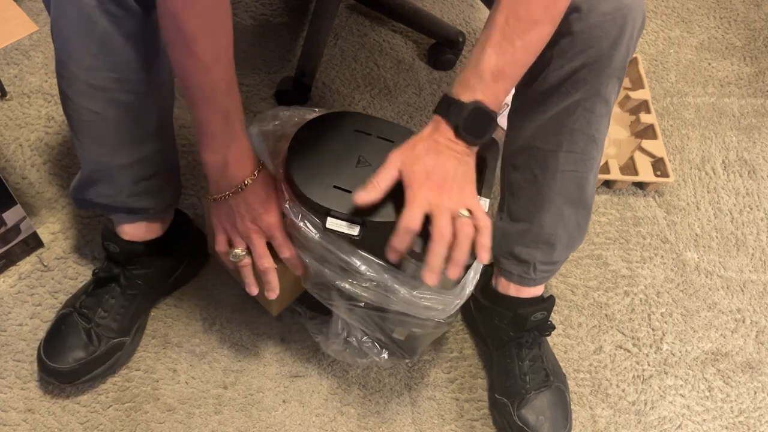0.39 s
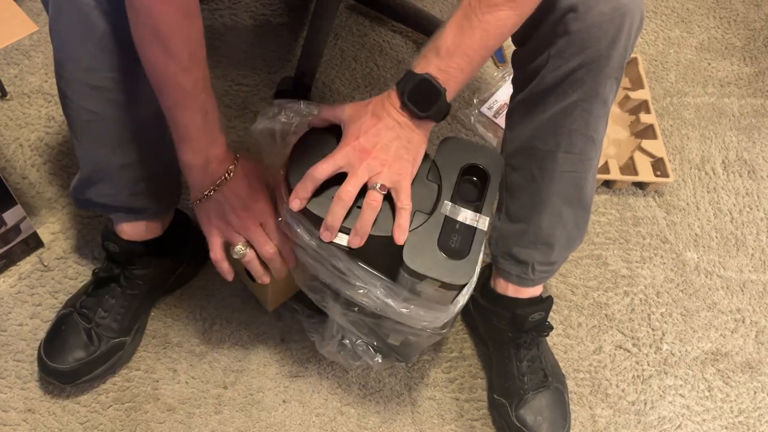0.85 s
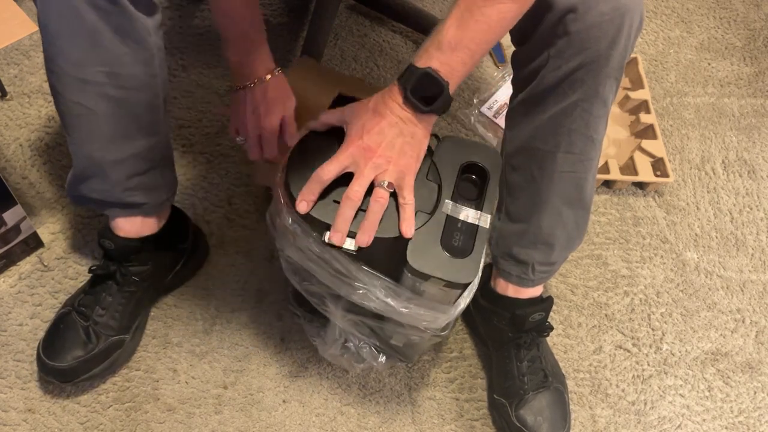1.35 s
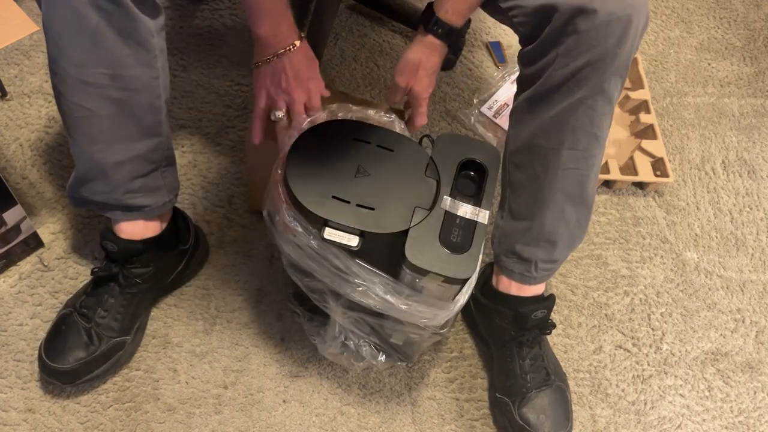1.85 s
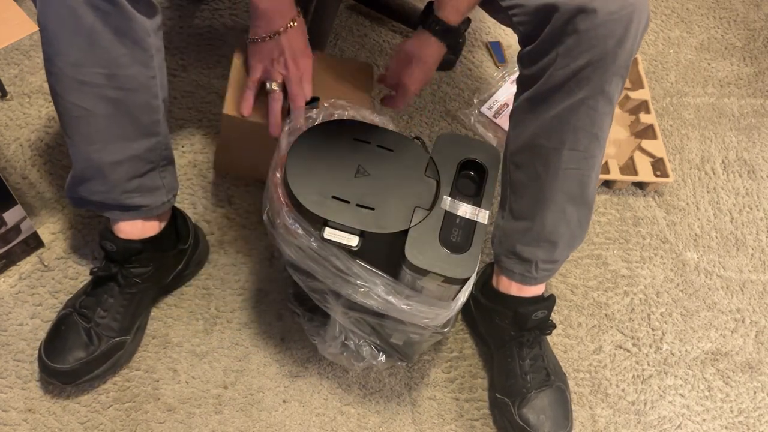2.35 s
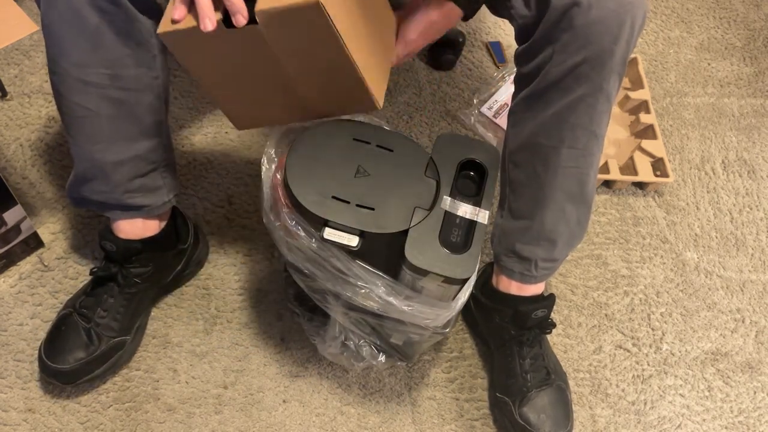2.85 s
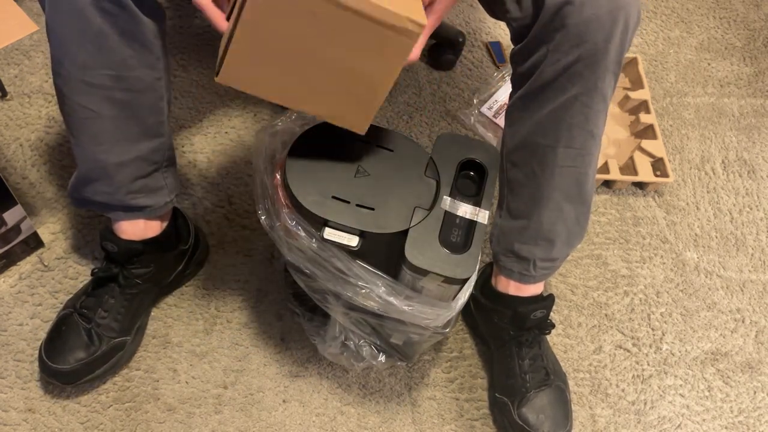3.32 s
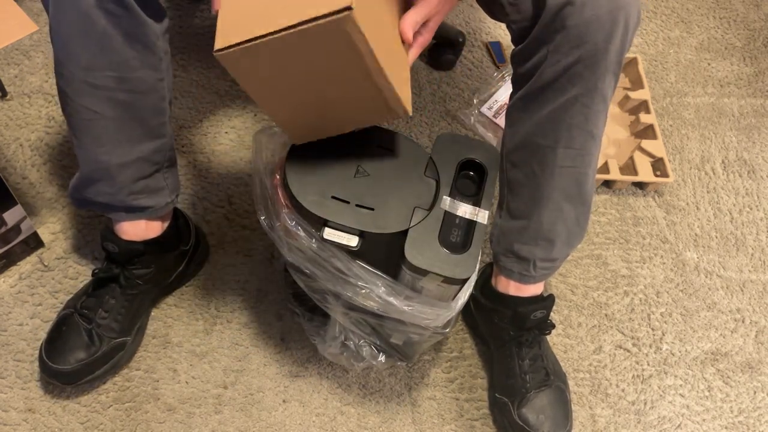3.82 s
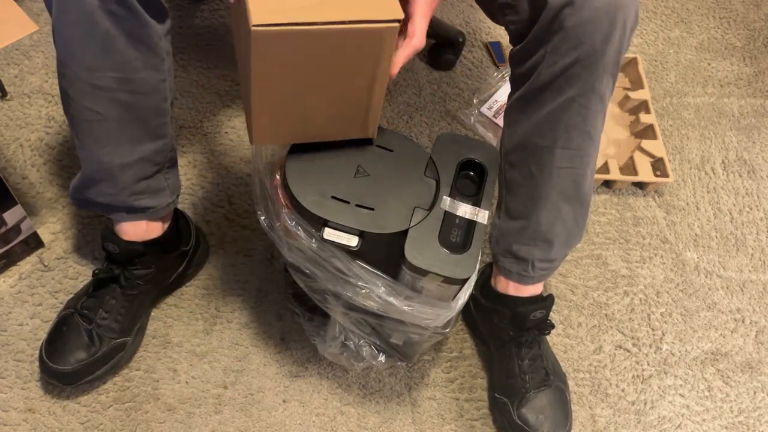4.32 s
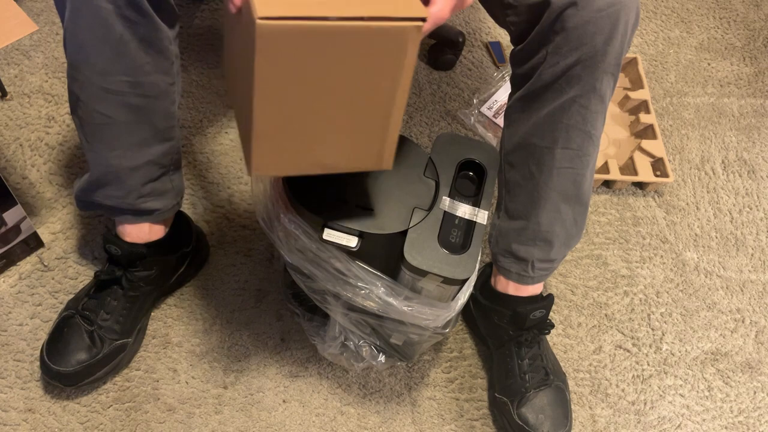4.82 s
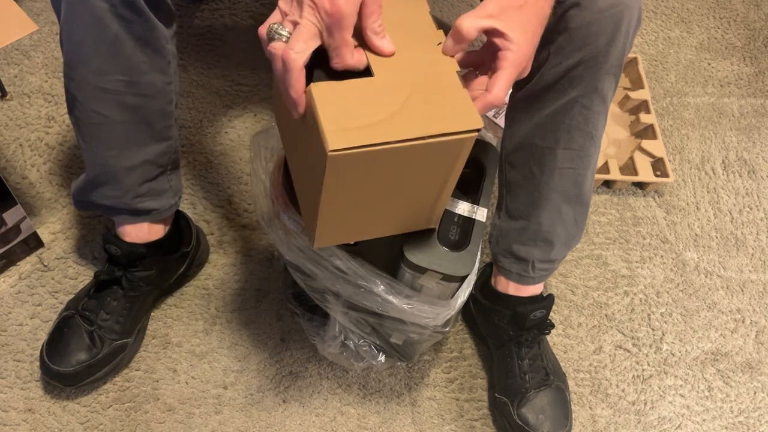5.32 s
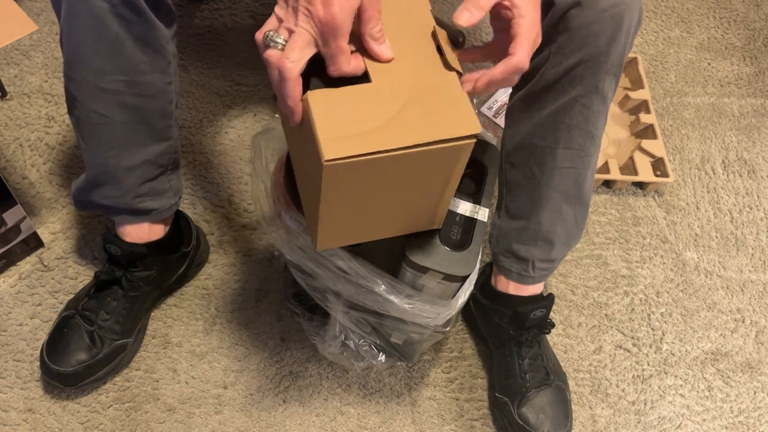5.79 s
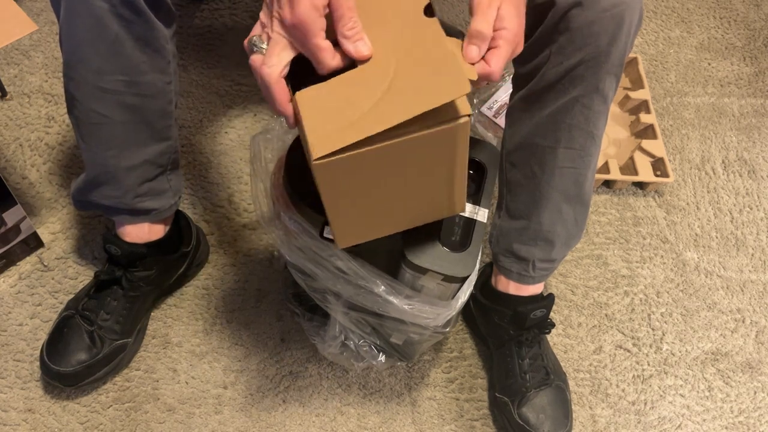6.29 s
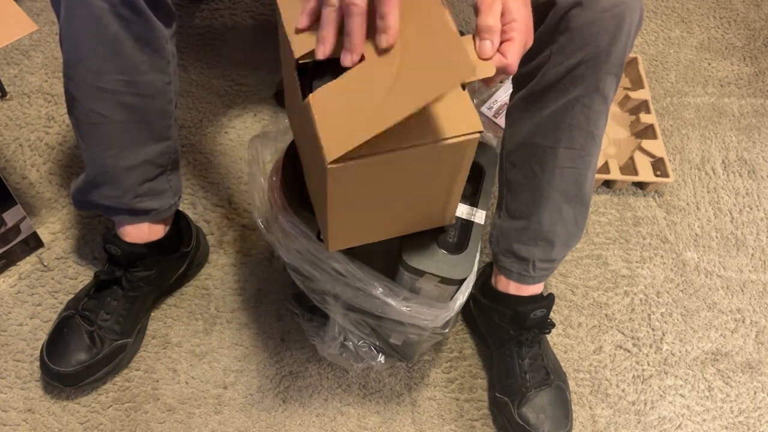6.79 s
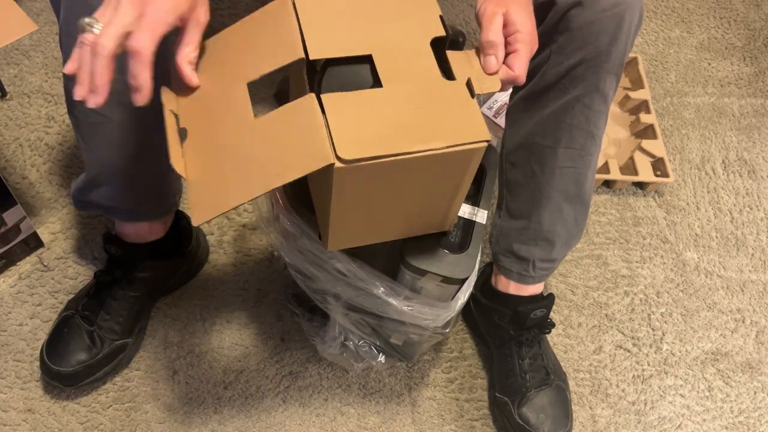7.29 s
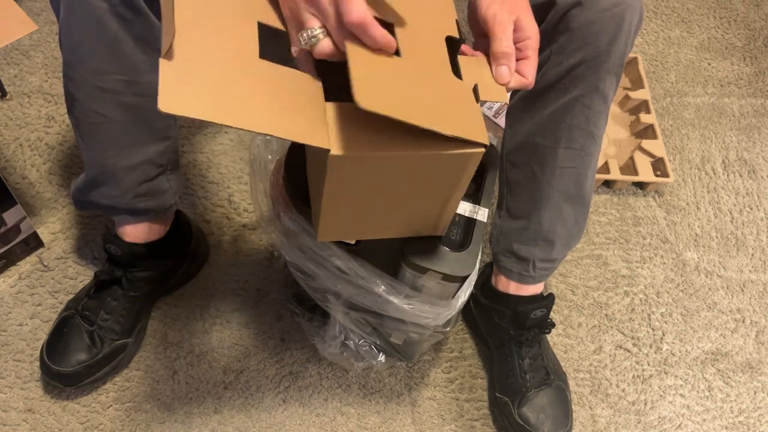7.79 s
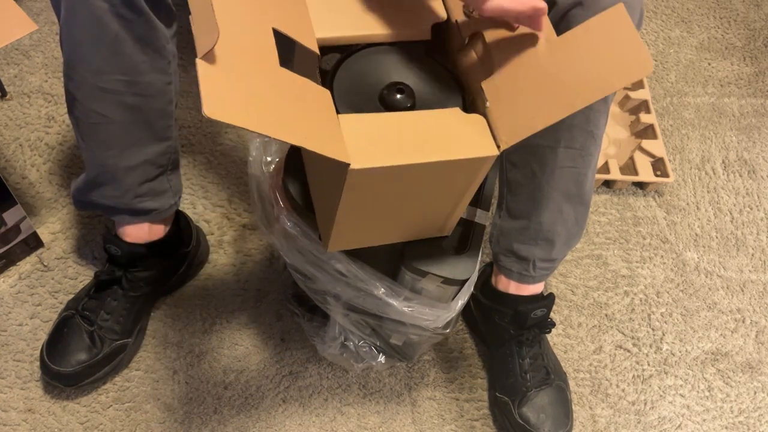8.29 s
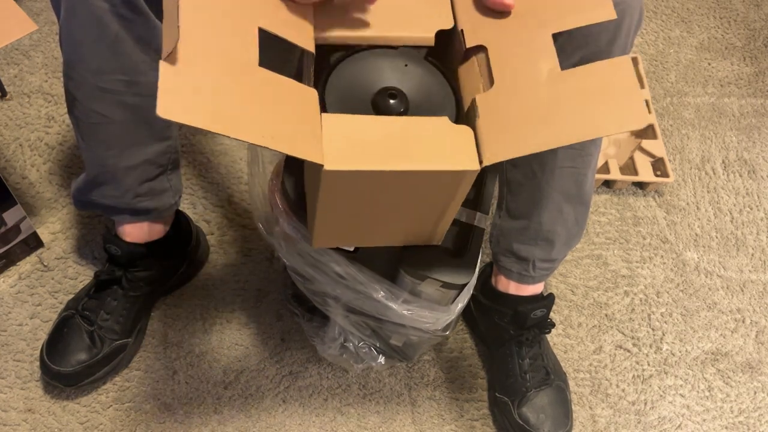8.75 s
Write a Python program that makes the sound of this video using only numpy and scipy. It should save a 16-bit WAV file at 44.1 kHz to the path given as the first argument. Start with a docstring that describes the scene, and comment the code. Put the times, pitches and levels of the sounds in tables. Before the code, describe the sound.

Close, dry handling sounds in a quiet indoor room: fingertips brushing cardboard, plastic film rustling, and dull hollow taps at the start. A softer stretch of brief rubs follows, with a few knocks near the middle. Then tabs let go with hard, bright cracks around five and a half and six seconds, followed by flaps scraping and bumping until the end, over faint room tone.

```python
"""Hands rub a cardboard box and a thin plastic bag, close to a phone microphone pair in a carpeted room.
Scrape, drag, film crackle and box boom are noise in short slips, each with its own colour, stroke by stroke.
Knocks and snaps are bursts of contact that ring the panels and the hollow, with a bright edge.
Behind them lie the short answer of the walls and a low room tone."""
import sys
import numpy as np
from scipy import signal
from scipy.fft import rfft, irfft, next_fast_len
from scipy.io import wavfile
from scipy.ndimage import uniform_filter1d, map_coordinates

SR = 44100
rng = np.random.default_rng(int(sys.argv[2]) if len(sys.argv) > 2 else 0)


def transcribe(signal):
    """Save signal, clipped to [-1, 1], as a 16-bit WAV file at the path in sys.argv[1]."""
    frames = np.atleast_2d(signal).T
    limited = np.clip(frames, -1, 1)
    pcm = np.round(limited * 32767).astype(np.int16)
    wavfile.write(sys.argv[1], SR, pcm)


def makeup_ratio(level_db):
    """Linear amplitude ratio for a level in decibels (20 dB per factor of ten)."""
    decades = np.asarray(level_db, float) / 20
    return 10 ** decades


N = 392049

# Passes of a hand or flap. Each row: start in seconds, length in seconds, then scrape, crackle and boom in dB.
STROKES = [(0.0, 0.037, -55.5, -41, -43.5), (0.109, 0.0052, -52.5, -43.5, -52),
           (0.239, 0.12, -49.5, -46.5, -50.5), (0.402, 0.084, -54.5, -52, -69),
           (0.525, 0.097, -54, -49.5, -53.5), (0.68, 0.051, -49, -46, -78), (0.867, 0.14, -43, -44, -47),
           (1.055, 0.1, -44.5, -54, -44.5), (1.196, 0.071, -44.5, -48, -33.5),
           (1.356, 0.1, -53, -54.5, -51.5), (1.509, 0.24, -53.5, -53, -53.5), (1.877, 0.032, -68, -54, -56),
           (1.934, 0.038, -52.5, -53.5, -53), (2.046, 0.049, -54, -69, -48.5),
           (2.148, 0.13, -59.5, -74, -53), (2.477, 0.12, -51.5, -46.5, -59), (2.697, 0.15, -45.5, -45, -53),
           (3.038, 0.22, -63, -53, -74), (3.31, 0.13, -66, -56, -91), (3.664, 0.16, -50, -52.5, -49.5),
           (3.922, 0.014, -48.5, -68, -51.5), (4.05, 0.18, -54, -48.5, -70),
           (4.313, 0.02, -55.5, -48.5, -76), (4.372, 0.029, -50.5, -72, -42),
           (4.456, 0.16, -50.5, -54, -68), (4.65, 0.11, -58, -57.5, -65.5), (5.072, 0.033, -45.5, -46, -52),
           (5.167, 0.17, -53.5, -86, -49.5), (5.344, 0.057, -36, -40.5, -46),
           (5.519, 0.044, -28, -33, -29.5), (5.883, 0.0049, -53, -51.5, -45),
           (5.953, 0.013, -38, -35.5, -44.5), (6.024, 0.0066, -38, -40.5, -44.5),
           (6.136, 0.016, -39.5, -40, -27.5), (6.194, 0.1, -50, -49, -40), (6.341, 0.012, -48, -48, -37.5),
           (6.403, 0.12, -48, -48, -49), (6.581, 0.0035, -34, -32, -44.5), (6.66, 0.025, -51, -51.5, -48.5),
           (6.716, 0.24, -50, -51, -53), (7.039, 0.052, -41, -44, -44.5), (7.16, 0.13, -58.5, -63.5, -59),
           (7.385, 0.094, -66, -49, -60), (7.439, 0.011, -48, -56, -44.5), (7.719, 0.13, -47, -49.5, -47.5),
           (7.895, 0.03, -45.5, -39, -49.5), (7.992, 0.097, -46, -43, -43.5),
           (8.162, 0.016, -41, -40.5, -41), (8.334, 0.016, -59, -43.5, -42.5),
           (8.515, 0.12, -46.5, -44, -41)]
# How a stroke dies away: scrape, crackle and boom, each in dB per second.
FALL_DB_PER_S = (380, 650, 170)
# Small movements between strokes. Each row: time in seconds, level in dB.
STIR = [(0.0, -62.5), (0.94, -47), (1.09, -42), (1.34, -53.5), (2.4, -50.5), (2.62, -45.5), (3.49, -59.5),
        (3.81, -47.5), (4.48, -60), (4.93, -65.5), (5.45, -40), (5.84, -61), (6.19, -66), (7.67, -55.5),
        (8.25, -49.5), (8.46, -51.5)]
# What that stir gives each layer: scrape, crackle and boom, each in dB over the stir.
STIR_SHARE_DB = (-7, -5, -10.5)
# Colour of fingertips on board. Each row: frequency in Hz, relative density in dB per Hz.
SCRAPE_COLOUR = [(500, -64), (1200, 2), (2800, 1.5), (5300, -10), (8000, -56)]
# Colour of a flat hand on board. Each row: frequency in Hz, relative density in dB per Hz.
DRAG_COLOUR = [(250, -39), (450, -12), (1050, -11), (1800, -31.5)]
# Colour of plastic film. Each row: frequency in Hz, relative density in dB per Hz.
FILM_COLOUR = [(1500, -9), (4500, -1.5), (7000, 1.5), (12000, -1), (15500, -4)]
# Panel modes of the board. Each row: frequency in Hz, width in Hz, relative strength in dB.
BOARD_MODES = [(600, 47, -7), (1000, 89, -12), (1181, 106, -15), (1573, 110, -12), (2423, 67, -23)]
# Air and walls of the hollow box. Each row: frequency in Hz, width in Hz, relative strength in dB.
HOLLOW_MODES = [(85, 63, -0.5), (193.8, 22, 2), (250, 44, -2), (327, 47, -2), (407, 166, -4.5)]
# Dull blows on the box. Each row: time in seconds, panel peak in dB, thump over panel in dB,
# panel pitch in Hz, thump pitch in Hz, contact build-up in seconds.
KNOCKS = [(0.032, -27, -3.5, 1290, 314, 0.00099), (0.58, -13, -5, 1360, 336, 0.0021),
          (0.871, -48, 13.5, 500, 400, 0.0047), (0.912, -27, -13, 1480, 450, 0.0019),
          (0.93, -19.5, -15.5, 1160, 450, 0.0019), (0.948, -25.5, -11, 1500, 453, 0.00072),
          (0.978, -24, -14, 2500, 437, 0.0014), (1.0, -30, -25, 2000, 445, 0.00094),
          (1.19, -20.5, -0.5, 1110, 300, 0.0017), (1.252, -26, 1, 530, 434, 0.006),
          (3.551, -23.5, -2.5, 1000, 323, 0.00081), (3.716, -30, -19, 690, 335, 0.0054),
          (3.938, -39, 3, 1230, 360, 0.0034), (4.372, -27.5, -4, 700, 168, 0.0015),
          (5.081, -15.5, -11.5, 796, 259, 0.001), (5.099, -27.5, 0, 600, 65, 0.0097),
          (5.225, -46, 8.5, 600, 54.5, 0.012), (5.572, -28, -2, 600, 92, 0.0034),
          (6.073, -19, -3, 653, 252, 0.0017), (6.254, -29.5, -12, 660, 270, 0.0053),
          (6.43, -32, -10, 650, 400, 0.0036), (6.354, -27, -16, 716, 456, 0.0042),
          (6.574, -20.5, -22, 1300, 408, 0.0044), (7.07, -17.5, -16, 1450, 292, 0.0026),
          (7.371, -33, -12, 1270, 196, 0.0065), (7.57, -33.5, -2.5, 563, 168, 0.0026),
          (8.063, -25, -24, 640, 126, 0.0027), (8.279, -26, -5, 600, 420, 0.0069),
          (8.511, -19.5, -6.5, 870, 442, 0.01), (8.553, -27.5, -11, 1540, 89.5, 0.0016),
          (8.615, -28.5, -2, 1550, 444, 0.0012)]
# Tabs and creases letting go. Each row: time in seconds, panel peak in dB, snap over panel in dB,
# thump over panel in dB, panel pitch in Hz.
SNAPS = [(0.283, -29, 1, -13, 1460), (0.526, -40.5, 15, -30, 3000), (0.827, -43, 10, -30, 3000),
         (1.443, -38, 13, -24, 3000), (1.858, -42.5, 11.5, -9, 3080), (4.689, -29.5, -2, -40, 2600),
         (5.1, -25.5, -5, -4, 4100), (5.126, -17.5, -5, -11, 1360), (5.204, -34, -2, -30, 2500),
         (5.216, -28, 2, -29, 1070), (5.34, -33, 7, -33, 2500), (5.352, -19, 1, -26, 2010),
         (5.373, -25, 2, -33, 2820), (5.524, -11.5, 11, -6.5, 794), (5.551, -2, -2, -12, 1074),
         (6.032, -27, 4.5, -31, 2430), (6.129, -10, -1, -15, 1066), (6.183, -14.5, 0.5, -4.5, 645),
         (6.289, -44.5, 15, -25, 3000), (6.644, -24, 2, -21, 3420), (6.772, -22.5, 0, -34, 2460),
         (7.061, -26, 11, -28, 3000), (7.887, -29, 3, -30, 2000), (7.906, -27.5, -5, -40, 1060),
         (7.981, -26.5, 7.5, -13, 1550), (8.155, -40, 11, -30, 2480), (8.19, -37.5, 17.5, -25, 1390)]
# Decay of the room. Each row: frequency in Hz, time to fall 60 dB in seconds.
ROOM_T60 = [(100, 0.59), (1000, 0.26), (8000, 0.095)]
# Room sound that differs at the two ports. Each row: frequency in Hz, gain in dB.
DIFFUSE_DB = [(60, -32), (300, -21), (800, -7.5), (1900, -19), (2500, -9), (5000, -4), (5800, -16)]
# Colour of the room tone. Each row: frequency in Hz, relative density in dB per Hz.
AIR_COLOUR = [(30, 11.5), (70, 8), (200, -14), (1000, -1), (15000, -45)]
# Phase between the ports. Each row: frequency in Hz, lead of the left port in radians.
LEAD = [(0, 0), (650, -1.05), (2000, 0), (2650, 2.1), (4000, .45), (5300, 1.2), (5800, 2.8), (22050, 19.2)]
# Level between the ports. Each row: frequency in Hz, left over right in dB.
TILT_DB = [(50, 0), (200, 2), (3500, -2), (5300, 0)]


def rubbing():
    """Moving hands drag on the board, crumple the film and shake the hollow box."""
    scrape_db, crackle_db, boom_db = strokes()
    drag_db = 0.34 * boom_db + 0.66 * scrape_db - 2.5  # the flat hand lies between scrape and boom
    board = modes(BOARD_MODES)

    def on_board(colour):
        return lambda f: makeup_ratio(along(colour, f)) * (1 + 0.19 * board(f))

    def film(f):
        return makeup_ratio(along(FILM_COLOUR, f))

    scrape = filtered(grains(350, spread_db=7, life=0.0008, hiss_db=2), on_board(SCRAPE_COLOUR))
    drag = filtered(grains(60, spread_db=2.5, life=0.002, hiss_db=8), on_board(DRAG_COLOUR))
    crackle = filtered(grains(450, spread_db=7, life=0.0005, hiss_db=2), film)
    boom = filtered(grains(40, spread_db=3.5, life=0.012, hiss_db=1.0), modes(HOLLOW_MODES))
    scrape = patchy(scrape, depth_db=2.5)
    drag = patchy(drag, depth_db=1.8)
    layers = [(scrape, scrape_db), (drag, drag_db), (crackle, crackle_db), (boom, boom_db)]
    judder = makeup_ratio(1.58 * wobble(45))  # the grip sticks and slips for all layers alike
    return judder * lift() * sum(unit(layer) * makeup_ratio(db) for layer, db in layers)


def strokes():
    """Levels in dB of scrape, crackle and boom: strokes rise, swell and fall over the small stir."""
    rise_db_per_s, swell_db_per_s = 650, 15.5
    t = np.arange(0, N / SR + .01, .001)
    start, length, *levels = np.transpose(STROKES)[:, :, None]
    since = t - start
    shape_db = rise_db_per_s * np.minimum(since, 0) + swell_db_per_s * np.clip(since, 0, length)
    after = np.maximum(since - length, 0)
    stir_db = np.interp(t, *np.transpose(STIR))
    curves = []
    for db, fall, share_db in zip(levels, FALL_DB_PER_S, STIR_SHARE_DB):
        power = np.sum(makeup_ratio(db + shape_db - fall * after) ** 2, axis=0)
        power = power + makeup_ratio(stir_db + share_db) ** 2
        curves.append(np.interp(np.arange(N) / SR, t, 10 * np.log10(power)))
    return curves


def grains(rate, spread_db, life, hiss_db):
    """Noise in slips of uneven size, rate a second, swelling and fading in life seconds over a finer hiss."""
    chance, size = rng.random((2, N))
    slips = (chance < rate / SR) * makeup_ratio(-spread_db * np.log(size + .05))
    t = np.arange(-400, 401) / SR
    swell = signal.fftconvolve(slips, np.exp(-np.abs(t) / life), "same")
    return (unit(swell) + makeup_ratio(hiss_db)) * rng.standard_normal(N)


def patchy(x, depth_db):
    """The colour drifts as the contact wanders over the surface."""
    z = signal.stft(x, nperseg=512)[2]
    field = uniform_filter1d(rng.standard_normal(z.shape), size=5, axis=0)  # over frequency
    field = uniform_filter1d(field, size=9, axis=1)  # over time
    return signal.istft(z * makeup_ratio(depth_db * unit(field)), nperseg=512)[1][:N]


def lift():
    """The hand eases off the board for a moment before each blow lands."""
    lands = np.array([row[0] for row in blows()])
    t = np.arange(N) / SR
    wait = np.append(lands, np.inf)[np.searchsorted(lands, t)] - t
    return makeup_ratio(-2.5 * np.exp(-wait / 0.042))


def blows():
    """Knocks and snaps in one form: time, panel peak, snap, thump, panel pitch, thump pitch, build-up."""
    knock_snap_db = -30  # faint edge of a knock, over its panel
    snap_thump_hz, snap_build_s = 302, 0.00085  # where a snap stirs the hollow, how fast it loads the board
    dull = [(s, db, knock_snap_db, *rest) for s, db, *rest in KNOCKS]
    bright = [(*row, snap_thump_hz, snap_build_s) for row in SNAPS]
    return sorted(dull + bright)


def knocks():
    """Every blow, knock or snap, laid in place: panels, hollow and bright edge together."""
    ahead = SR // 40  # room for the creak before contact
    since = np.arange(-ahead, SR // 4) / SR
    t = np.maximum(since, 0)
    out = np.zeros(N + SR)
    for s, db, snap_db, thump_db, panel_hz, thump_hz, build_s in blows():
        build_s = max(build_s, 1e-4)
        soft = build_s / (build_s + 0.0004)  # 0 hard, 1 soft
        burst = contact(t, build_s)
        panels = struck_panels(burst, panel_hz, soft)
        hollow = struck_hollow(t, burst, thump_hz, soft)
        blow = panels + makeup_ratio(snap_db) * bright_edge(since) + makeup_ratio(thump_db) * hollow
        out[round(s * SR):][:len(t)] += makeup_ratio(db) * blow
    return out[ahead:ahead + N]


def contact(t, build_s):
    """Force of contact: the board yields before it pushes back, then loose flaps shiver on."""
    t60_s = .007 + 7.8 * build_s
    rattle = makeup_ratio(-35 - 60 * t / 0.35)
    return (makeup_ratio(-60 * t / t60_s) + rattle) * (1 - np.exp(-t / build_s))


def struck_panels(burst, panel_hz, soft):
    """A hard blow spreads over all pitches, a soft one picks the board modes near its own."""
    low_hz, top_hz = 300, 4340  # panels radiate little outside these
    board = modes(BOARD_MODES + patch(panel_hz, -6), scatter_db=2.5)

    def response(f):
        ring = (soft * board(f) + 0.24) * near_pitch(f, panel_hz, 2.1 * soft)
        return ring / (1 + (f / top_hz) ** 8) * (1j * f / (low_hz + 1j * f)) ** 2

    return peak(filtered(rng.standard_normal(len(burst)) * burst, response))


def struck_hollow(t, burst, thump_hz, soft):
    """One clean shove of the air inside, stronger for hard blows, and rough contact ring the box."""
    box = modes(HOLLOW_MODES + patch(thump_hz, 2.0), scatter_db=2.5)
    push_s = 1 / (2 * np.pi * thump_hz)
    push = unit(t * np.exp(-t / push_s))
    rough = unit(rng.standard_normal(len(t)) * burst)
    return peak(filtered((1 - soft) * push + 0.3 * rough, lambda f: box(f) * near_pitch(f, thump_hz, 2.8)))


def bright_edge(since):
    """Noise that creaks under load just before release, cracks at once and leaves a short tail."""
    t = np.maximum(since, 0)
    strain = (since < 0) * makeup_ratio(-15) * np.exp(np.minimum(since, 0) / 0.003)
    decay = makeup_ratio(-60 * t / .004) + makeup_ratio(-15.0 - 60 * t / 0.017)
    crack = decay * (1 - np.exp(-t / 0.00035)) + strain
    noise = rng.standard_normal(len(t))
    return peak(filtered(noise * crack, lambda f: makeup_ratio(along(FILM_COLOUR, f)) * (f / 8000) ** 0.1))


def patch(hz, db):
    """The struck patch rings at its own pitch, a quarter of that pitch wide."""
    return [(hz, hz / 4, db)]


def near_pitch(f, hz, sharp):
    """A struck spot favours modes near its pitch."""
    return 1 / (1 + (sharp * np.log((f + 1) / hz)) ** 2)


def modes(table, scatter_db=0):
    """Causal response of resonances in alternating sense, struck at new strengths."""
    gains = makeup_ratio(scatter_db * rng.standard_normal(len(table)))

    def response(f):
        total = 0
        for k, (centre, width, db) in enumerate(table):
            damping = 1j * f * width
            total = total + (-1) ** k * gains[k] * makeup_ratio(db) * damping / (centre ** 2 - f * f + damping)
        return total

    return response


def room(x):
    """The walls' answer: decaying noise, drawn anew every quarter second."""
    out, step = np.zeros(N + SR), SR // 4
    for start in range(0, N, step):
        hz, t, z = signal.stft(rng.standard_normal(SR // 3), SR, nperseg=256)
        decay = makeup_ratio(-60 * t / along(ROOM_T60, hz)[:, None])
        tail = signal.istft(z * decay, SR, nperseg=256)[1]
        wet = signal.fftconvolve(x[start:start + step], tail / np.linalg.norm(tail))
        out[start:start + len(wet)] += wet
    return out[:N]


def room_tone():
    """The still room: steady noise, heaviest in the bass."""
    return makeup_ratio(-61) * unit(filtered(rng.standard_normal(N), lambda f: makeup_ratio(along(AIR_COLOUR, f))))


def unit(x):
    """Scaled to rms 1."""
    return x / np.sqrt(np.mean(x ** 2) + 1e-20)


def peak(x):
    """Scaled to peak 1."""
    return x / np.abs(x).max()


def along(points, hz):
    """Values between (Hz, value) points on a log axis."""
    f, v = np.transpose(points)
    return np.interp(np.log(hz + 1), np.log(f + 1), v)


def wobble(rate):
    """A smooth random curve, rate knots a second."""
    return map_coordinates(rng.standard_normal(int(N * rate / SR) + 4), [np.arange(N) * rate / SR])


def filtered(x, response):
    """x shaped by a complex response of frequency."""
    m = next_fast_len(x.shape[-1] + 8192)
    return irfft(rfft(x, m) * response(np.fft.rfftfreq(m, 1 / SR)), m)[..., :x.shape[-1]]


def scene():
    """Near sound reaches both ports alike, the diffuse part in opposite sense."""
    near = rubbing() + knocks()
    tone = room_tone()
    alike = near + makeup_ratio(-13.5) * room(near) + tone
    unlike = filtered(room(near + tone), lambda f: makeup_ratio(along(DIFFUSE_DB, f)))
    return np.array([alike + unlike, alike - unlike])


def low_pass(x):
    """Removes everything above the highest recorded frequency."""
    return signal.sosfilt(signal.butter(12, 17150, fs=SR, output="sos"), x)


def record(dry):
    """The ports differ in phase and level; the capsules lose the deep bass; a sharp cut falls at 15.8 kHz."""
    half = np.array([[.5], [-.5]])  # left and right share each difference

    def ports(f):
        phase = half * np.interp(f, *np.transpose(LEAD))
        return np.exp(1j * phase) * makeup_ratio(half * along(TILT_DB, f))

    def capsule(f):
        return (1j * f / (55 + 1j * f)) ** 2

    def below_cut(f):
        return f < 15800

    mix = filtered(dry, lambda f: ports(f) * capsule(f) * below_cut(f))
    return low_pass(mix)


dry = scene()
out = record(dry)
transcribe(out)
```